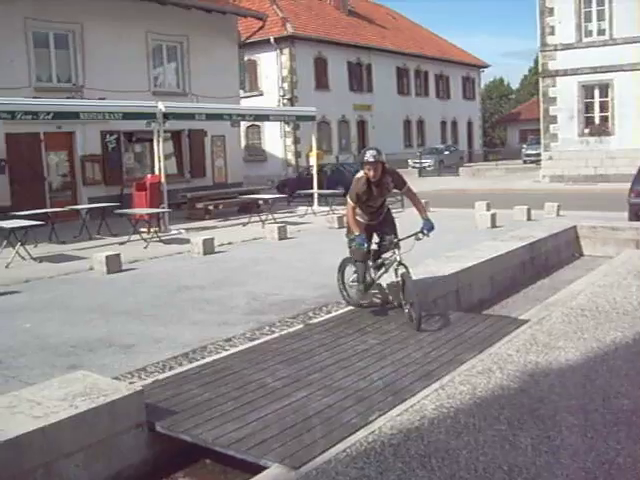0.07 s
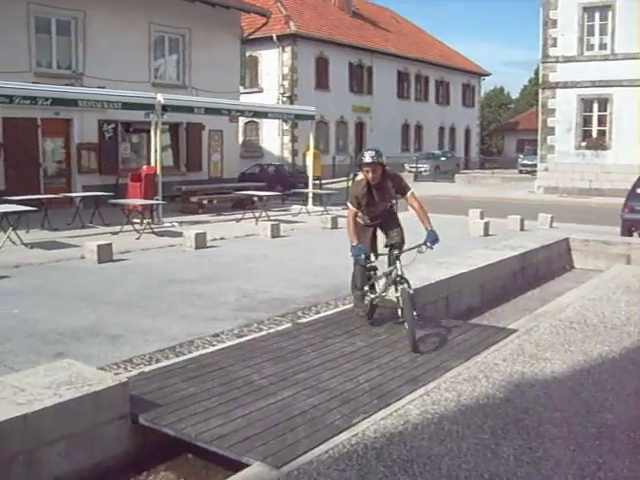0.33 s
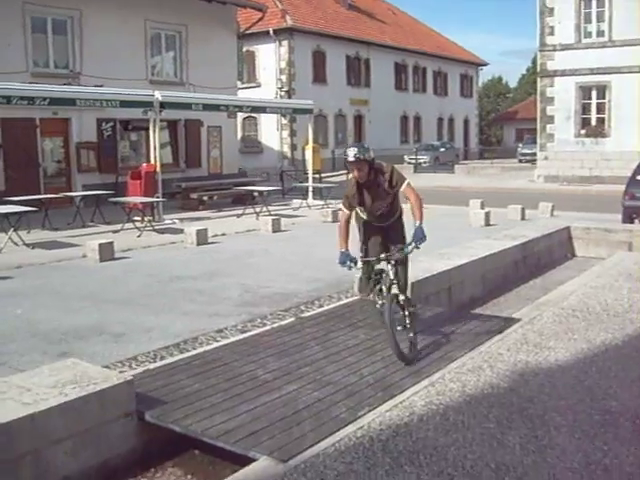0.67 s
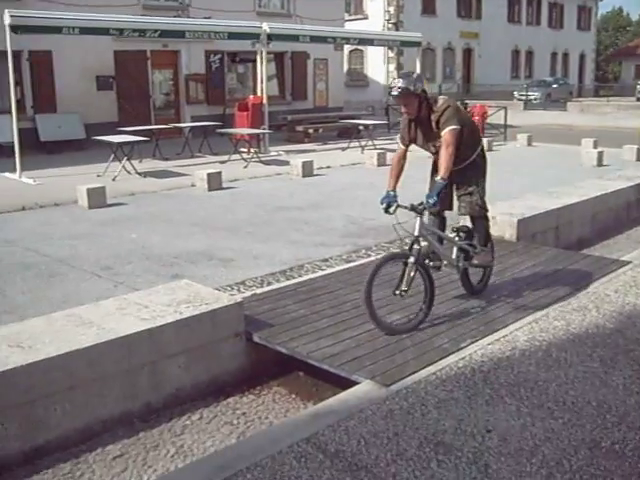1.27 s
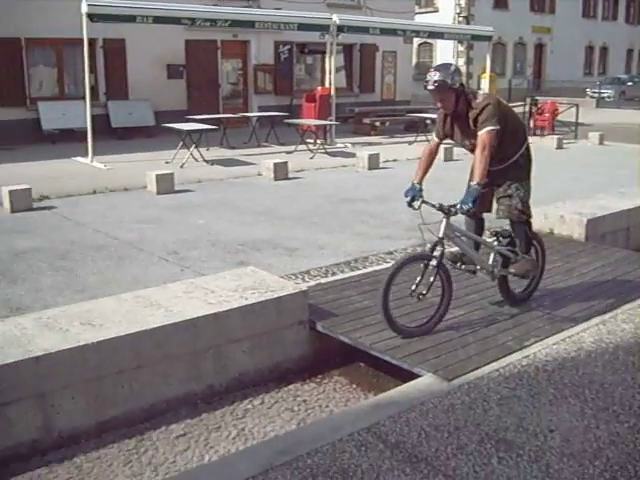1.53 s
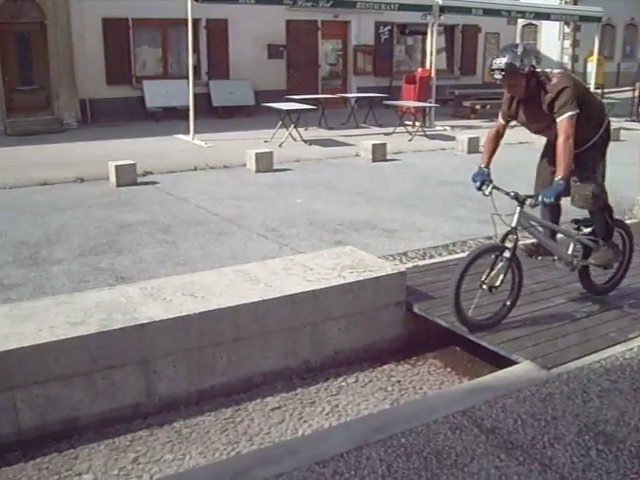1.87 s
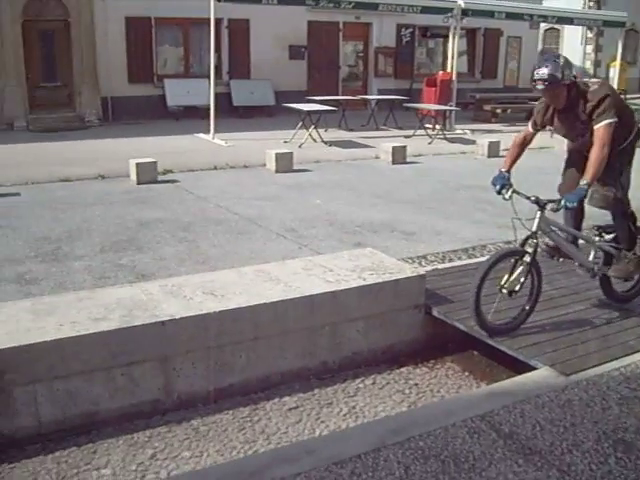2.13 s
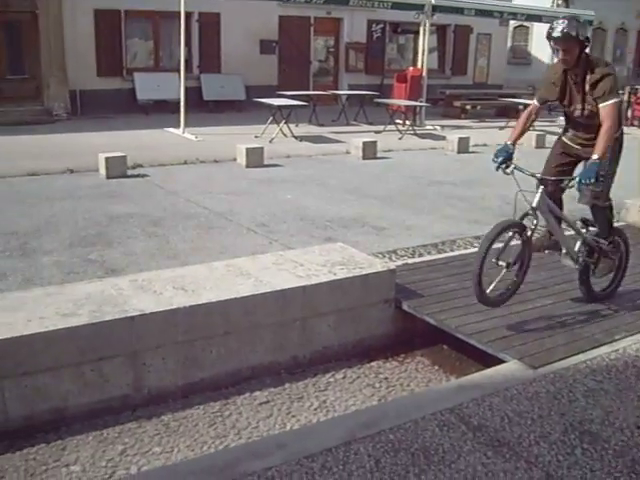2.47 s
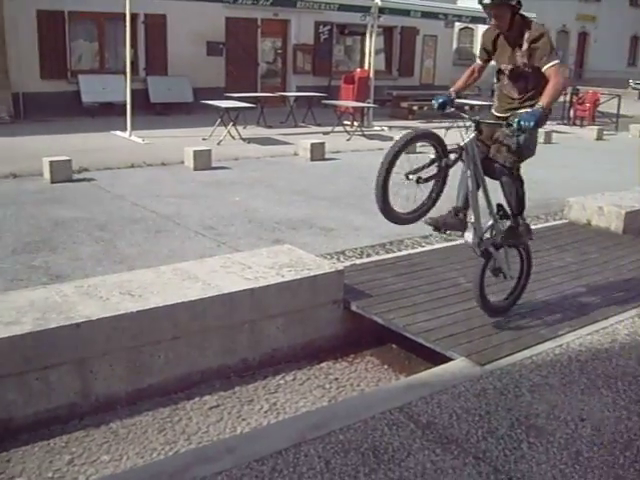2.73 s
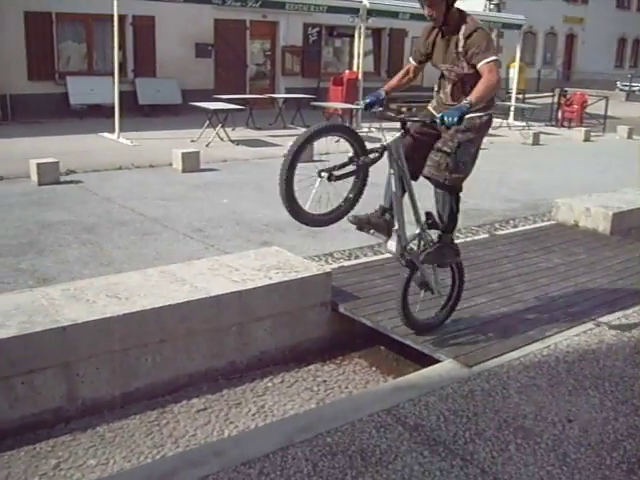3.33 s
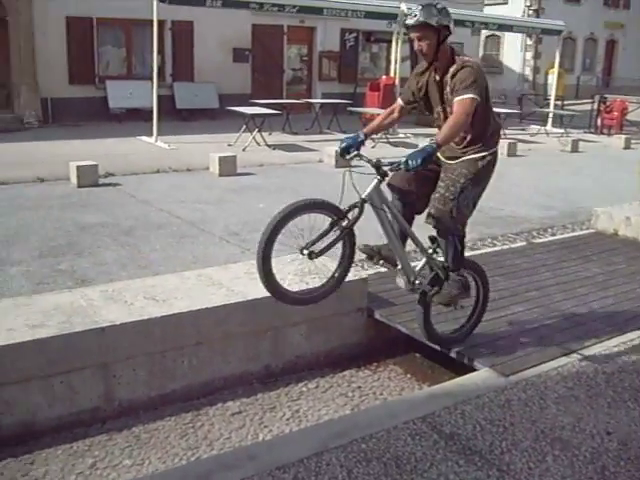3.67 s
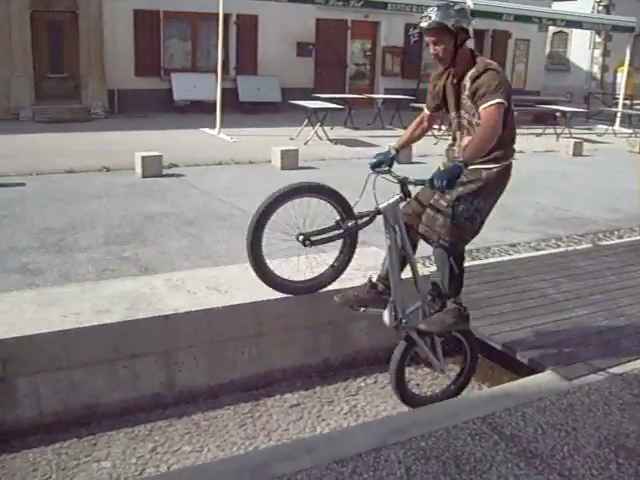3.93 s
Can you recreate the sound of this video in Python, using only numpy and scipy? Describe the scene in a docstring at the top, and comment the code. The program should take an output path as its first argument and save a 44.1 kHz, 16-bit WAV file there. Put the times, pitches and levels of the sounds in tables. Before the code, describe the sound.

A bicycle hops on its back tyre on a wooden deck, making four sharp knocks. Light clicks and a ringing brake bite come first, and more clicks fall between the landings, echoing briefly in a quiet town square.

```python
"""A distant town wash and light wind on a small camera microphone open a quiet square. Brakes and drive click
and the boards creak as a trials bike rolls onto a wooden deck; one bite of the brake rings the frame. The bike
hops on its back tyre, and four landings each clap a plank down, exciting its damped modes. Low stone walls and
house fronts reflect the knocks and clicks, which die away in reverberation."""
import sys
import numpy as np
from scipy import signal
from scipy.fft import rfft, irfft
from scipy.io import wavfile

SR = 44100
rng = np.random.default_rng(int(sys.argv[2]) if len(sys.argv) > 2 else 0)


def store_pcm(level_fs):
    """Save levels as 16-bit WAV."""
    pcm = np.round(np.clip(level_fs, -1, 1) * 32767).astype(np.int16)
    wavfile.write(sys.argv[1], SR, np.atleast_2d(pcm).T)


N = 176400

# Spectra of the town, microphone hiss, wind and brake rub. Each row: frequency in Hz, relative density in dB.
TOWN_SPECTRUM = [(180, -16), (300, -10.5), (329, -16), (372, -12.5), (520, -1.5), (634, -2), (762, -6),
                 (1030, -0.5), (2020, -6), (2250, -9.5), (3250, -1), (5460, -38), (7640, -45), (8250, -33),
                 (11500, -56), (15000, -77), (22000, -120)]
HISS_SPECTRUM = [(30, -32), (200, -3), (500, -4.5), (1100, 1), (2300, -6), (2800, -0.5), (3200, 5.5),
                 (3700, -10), (5000, -21), (7000, -27), (10500, -27), (12000, -62)]
WIND_SPECTRUM = [(20, 3), (70, 3), (150, 2), (250, -3.5), (400, -14.5), (700, -16), (1500, -66),
                 (5000, -69)]
RUB_SPECTRUM = [(200, -43), (2400, -10), (2950, 2), (3300, -9), (3900, -23), (6500, -29), (11000, -48)]
# Envelope of the town wash. Each row: time in seconds, level in dB.
TOWN_ENVELOPE = [(0, -57.5), (.2, -53.5), (.6, -59), (.9, -62), (1.2, -60), (1.55, -68.5), (2.1, -73.5),
                 (4, -63.5)]
# Puffs of wind. Each row: centre in seconds, 1/e half-width in seconds, level in dB.
WIND_PUFFS = [(0.052, 0.047, -57.5), (0.417, 0.2, -64.5), (0.549, 0.018, -60), (0.716, 0.057, -61),
              (1.137, 0.046, -62), (1.283, .07, -63), (1.43, 0.016, -60), (2.446, 0.095, -60.5),
              (2.492, 0.0045, -41), (2.592, 0.017, -51), (2.804, 0.047, -54), (2.886, 0.036, -53.5),
              (3.27, 0.023, -71)]
# Brake and drive clicks, with a few creaks of the deck boards near 2.29-2.33 s. Each row: start in seconds,
# level in dB, T60 in seconds, then middle, treble and metal ping gains in dB.
BIKE_CLICKS = [(1.019, -20, 0.16, 8, 0, -2), (1.214, -32, 0.055, -3, -3, 8), (1.879, -21, 0.039, 2, -10, 1),
               (1.979, -17, 0.032, -6, -5, 0.5), (2.012, -17.5, 0.015, 10, -8, -20),
               (2.196, -21.5, 0.062, 7, -8, 2), (2.21, -20.5, 0.024, 5, -5, -11),
               (2.233, -5, .03, -9, -3, 8), (2.292, -7, .04, 5, 2.5, -2), (2.305, -10, 0.021, 6, 9, 0),
               (2.318, -8, 0.015, 0, 0, 2.5), (2.328, -3, .04, 2.5, -2, -5.5),
               (2.644, -15, .04, 6, -5, 6.5), (2.912, -11, 0.019, -5, 3, 9.5),
               (2.995, -19, 0.022, -3, 9.5, 10), (3.373, -13.5, 0.055, 13, 3, -0.5),
               (3.443, -10.5, 0.053, -3, 13.5, 1), (3.687, 0, 0.046, 4.5, 4, 0.5),
               (3.798, -15, 0.077, 14.5, 0, 1), (3.863, -20.5, 0.036, -4, 12.5, -2),
               (3.880, -17, 0.027, -5, 4, 13.5), (3.993, -3, 0.12, 5.5, -10.5, 7)]
# Responses of a click, the brake bite and a plank. Each row: frequency in Hz, gain in dB.
CLICK_RESPONSE = [(100, -70), (600, -18), (1100, -8), (1600, -6), (2500, 2.5), (3000, 8), (3300, 9),
                  (3700, 1), (4500, -8), (6000, -23.5), (10000, -33.5), (12500, -52)]
BITE_RESPONSE = [(200, -35), (1900, -12), (2150, 5), (2400, 14.5), (2750, 3.5), (3150, 14.5), (3500, -0.5),
                 (4100, -12), (4800, -6), (5400, -22), (10000, -34), (12500, -56)]
PLANK_RESPONSE = [(30, -6), (200, -8), (450, -11), (640, -8), (780, -4), (920, -0.5), (1150, 1), (1400, 2),
                  (1750, 7), (2400, 6), (2850, 10), (3250, 11.5), (3600, 5), (4500, -1.5), (6000, -13),
                  (8000, -20.5), (10300, -25), (11800, -47.5)]
# Reflections from deck edge and low walls, and from house fronts. Each row: delay in seconds, gain in dB.
WALL_ECHOES = [(.0085, -12), (0.0205, -8.5), (0.0212, -16.5), (0.033, -37.5)]
FRONT_ECHOES = [(.069, -25.5), (.083, -31.5), (0.109, -25.5), (.148, -30), (0.174, -30.5)]
# Responses of specular and diffuse reflection. Each row: frequency in Hz, gain in dB.
SPECULAR_RESPONSE = [(100, -22), (600, -3.5), (950, 8.5), (1300, 3.5), (2200, 2.5), (3200, -4), (4500, -8),
                     (7000, -9), (11000, -12)]
DIFFUSE_RESPONSE = [(100, -15), (400, 1.5), (800, 7), (1700, 4.5), (3200, 3.5), (5000, -2), (8000, -3),
                    (11000, -5)]
# Reverberation time of the square. Each row: frequency in Hz, T60 in seconds.
REVERB_TIMES = [(100, 0.58), (700, 1.0), (1700, 0.84), (3200, 0.81), (6000, 0.92), (11000, 1)]
# Modes of frame and plank. Each row: frequency in Hz, relative level in dB, T60 in seconds.
FRAME_RESONANCES = [(2160, -48, 0.33), (2320, -41, 0.25), (2385, -34.5, 0.23), (2530, -47, .25),
                    (2870, -42, 0.16), (3070, -46, .2), (2950, -30, 0.13)]
PLANK_RESONANCES = [(1130, -72.5, .04), (1730, -67, 0.053), (1840, -52.5, 0.1), (2064, -68, .05),
                    (2897, -31.5, 0.024), (3230, -29.5, 0.057)]
# Tyre landings. Each row: start in seconds, level in dB, then hollow note, middle, treble, bass
# and clatter gains in dB.
LANDINGS = [(2.2363, 2.5, -28.5, -7, 3, -25, 4), (2.6737, 10.5, -48, -2, -6, -17, -6.5),
            (3.0687, 15.5, -45.5, 2, -8, 1, -8), (3.4624, 6, -36.5, 4, -4, -20, -2)]

BASS_HZ, MIDDLE_HZ, PING_HZ, TREBLE_HZ = 340, 1604, 3256, 4770
FILTER_HZ = np.fft.rfftfreq(8192, 1 / SR)


def amp(db):
    """Amplitude ratio of a level in decibels."""
    return 10 ** (np.asarray(db) / 20)


def read(points, hz=FILTER_HZ):
    """Interpolation on a logarithmic frequency axis."""
    frequency, value = np.transpose(points)
    return np.interp(np.log(hz + 1), np.log(frequency + 1), value)


def noise(spectrum):
    """Spectral shaping of white noise, scaled to unit rms."""
    gain = amp(read(spectrum, np.fft.rfftfreq(N, 1 / SR)))
    x = irfft(rfft(rng.standard_normal(N)) * gain, N)
    return x / np.sqrt(np.mean(x ** 2) + 1e-20)


def add(mix, start_s, sound):
    """Superposition of a delayed sound on a mix."""
    part = mix[round(start_s * SR):][:len(sound)]
    part += sound[:len(part)]


def convolve(x, response):
    """Convolution, cut to the input's length."""
    return signal.fftconvolve(x, response)[:len(x)]


def filtered(x, gain_db, smear=1):
    """Minimum-phase filtering; a smear above 1 multiplies the group delay, holding resonances back."""
    log_gain = np.log(amp(np.maximum(gain_db, -100)))
    mirrored = np.r_[log_gain, log_gain[-2:0:-1]]
    phase = -smear * signal.hilbert(mirrored).imag
    response = np.fft.ifft(np.exp(mirrored + 1j * phase)).real
    return convolve(x, response[:len(gain_db) // 2])


def bell(hz, octaves):
    """Gaussian band weighting in log frequency."""
    return np.exp(-.5 * (np.log2((FILTER_HZ + 1) / hz) / octaves) ** 2)


def above(hz):
    """Shelf weighting, rising from 0 to 1 around hz."""
    return 1 - 1 / (1 + (FILTER_HZ / hz) ** 6)


def decay(t, t60):
    """Exponential damping, 60 dB in t60 seconds."""
    return amp(-60 * t / t60)


def burst(t, t60, rise_s):
    """Dense random impulses under a decaying envelope, with unit energy."""
    x = rng.choice([-1., 1.], len(t)) * decay(t, t60) * np.minimum((t + 1 / SR) / rise_s, 1)
    return x / np.linalg.norm(x)


def ring(t, modes):
    """Free vibration as a sum of damped modes."""
    return sum(amp(db) * decay(t, t60) * np.sin(2 * np.pi * hz * t) for hz, db, t60 in modes)


def tone(hz, db):
    """Simple harmonic motion at a given peak level."""
    return amp(db) * np.sin(2 * np.pi * hz * np.arange(N) / SR)


def town_wash(t):
    """Amplitude modulation makes the distant town's noise flutter as it ebbs."""
    flutter_db = 0.94 * noise([(1, 3), (25, 8), (80, -7), (400, -100)])
    level_db = np.interp(t, *np.transpose(TOWN_ENVELOPE))
    return noise(TOWN_SPECTRUM) * amp(level_db + flutter_db)


def microphone_hiss():
    """Self-noise of the microphone: a broadband hiss and a thin whine."""
    return amp(-60.5) * noise(HISS_SPECTRUM) + tone(hz=8000, db=-87.5)


def wind(t):
    """Turbulent pressure at the microphone: low puffs over a steady breeze."""
    breeze = amp(-71.5)
    puffs = sum(amp(db) * np.exp(-((t - centre) / width) ** 2) for centre, width, db in WIND_PUFFS)
    return noise(WIND_SPECTRUM) * (breeze + puffs)


def clicks():
    """Impulsive excitation: brief contacts in brakes and drive, and a few creaks of the deck boards, filtered
    by resonant responses."""
    out, t = np.zeros(N), np.arange(SR // 2) / SR
    for start, db, t60, middle_db, treble_db, ping_db in BIKE_CLICKS:
        colour = read(CLICK_RESPONSE) + middle_db * bell(MIDDLE_HZ, octaves=0.29)
        colour += treble_db * above(TREBLE_HZ) + ping_db * bell(PING_HZ, octaves=.035)
        add(out, start, amp(db) * filtered(burst(t, t60, rise_s=0.0011), colour))
    return out


def square_reflections(x):
    """Specular reflection from walls, scattering from stonework and a diffuse reverberant tail."""
    t, walls, scatter = np.arange(SR) / SR, np.zeros(SR), np.zeros(SR)
    for delay, db in WALL_ECHOES:
        add(walls, delay, amp([db]))
    for delay, db in FRONT_ECHOES:
        add(scatter, delay, amp(db) * burst(t[:SR // 20], t60=0.027, rise_s=.001))
    add(scatter, .021, amp(-15) * burst(t, t60=0.12, rise_s=0.0019))  # nearby stonework
    hz, when, bands = signal.stft(rng.standard_normal(SR), SR, nperseg=256)
    bands *= decay(when, read(REVERB_TIMES, hz)[:, None])
    tail = signal.istft(bands, SR, nperseg=256)[1][:SR]
    tail *= np.sqrt(np.minimum(t / 0.044, 1))  # energy builds over 44 ms
    diffuse = filtered(scatter + amp(-14) * tail / np.linalg.norm(tail), read(DIFFUSE_RESPONSE))
    specular = filtered(walls, read(SPECULAR_RESPONSE))
    return convolve(x, diffuse + specular)


def brake_rub(t, centre_s=1.765, width_s=0.035):
    """Sliding friction of pad on rim gives a faint swell of noise."""
    return amp(-55) * noise(RUB_SPECTRUM) * np.exp(-((t - centre_s) / width_s) ** 2)


def brake_bite(start_s=1.7995):
    """Transient excitation: the brake grips and the frame rings on in its natural modes."""
    out, t = np.zeros(N), np.arange(SR // 2) / SR
    grip = filtered(burst(t, t60=0.057, rise_s=0.0011), read(BITE_RESPONSE))
    frame = amp(-15.5) * ring(t, FRAME_RESONANCES)
    add(out, start_s, amp(-2.5) * (grip + frame))
    return out


def plank_knocks(hollow_hz=672, hollow_t60=0.041):
    """Impact of plank on joist excites its modes and the hollow under the deck; the square echoes it."""
    out, t = np.zeros(N), np.arange(SR) / SR
    bass, middle, treble = 1 - above(BASS_HZ), bell(MIDDLE_HZ, octaves=0.37), above(TREBLE_HZ)
    crack = t == 0  # a unit impulse
    for start, db, hollow_db, middle_db, treble_db, bass_db, clatter_db in LANDINGS:
        clatter = filtered(burst(t, t60=0.029, rise_s=0.00067), -7 * treble - 8 * bass)
        contact = crack + amp(clatter_db) * clatter
        wood = filtered(contact, read(PLANK_RESPONSE), smear=2.34) + ring(t, PLANK_RESONANCES)
        colour = middle_db * middle + treble_db * treble + bass_db * bass
        hollow = ring(t, [(hollow_hz, hollow_db, hollow_t60)])
        knock = amp(db) * (filtered(wood, colour) + hollow)
        add(out, start, knock + square_reflections(knock))
    return out


def low_hum(t, start_s=3.1, rise_s=0.081):
    """A faint pure tone enters on a linear ramp."""
    return tone(hz=106, db=-70) * np.clip((t - start_s) / rise_s, 0, 1)


def scene():
    """Linear superposition of bike, deck, reflections and background in one channel."""
    t = np.arange(N) / SR
    metal = clicks() + brake_bite()
    deck = plank_knocks()
    bike = metal + amp(-2.5) * square_reflections(metal) + brake_rub(t)
    background = town_wash(t) + microphone_hiss() + wind(t) + low_hum(t)
    return (bike + deck + background)[None]


def record(dry, start_s=0.0382, rise_s=0.012, ceiling=.71, cutoff_hz=11700):
    """The microphone fades in; soft saturation rounds the highest peaks and a low-pass limits the band."""
    opened = dry * np.clip((np.arange(N) / SR - start_s) / rise_s, 0, 1)
    saturated = opened / (1 + (opened / ceiling) ** 8) ** (1 / 8)
    low_pass = signal.firwin(255, cutoff_hz, window=("kaiser", 8), fs=SR)
    return signal.oaconvolve(saturated, low_pass[None], "same")


dry = scene()
out = record(dry)
store_pcm(out)
```